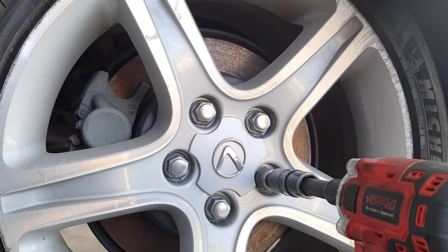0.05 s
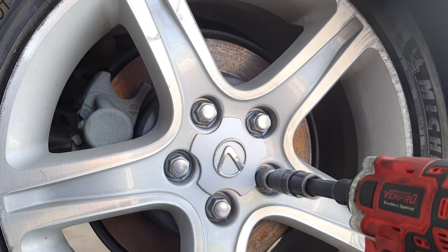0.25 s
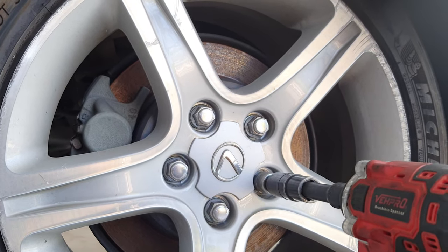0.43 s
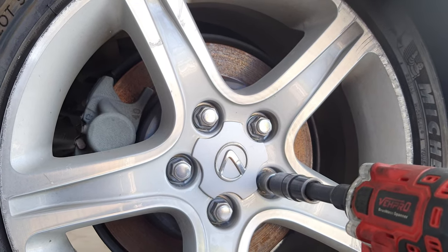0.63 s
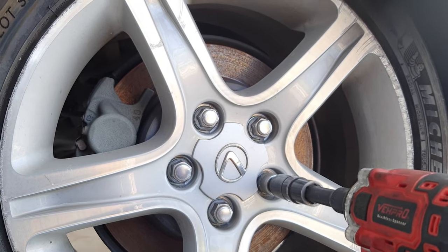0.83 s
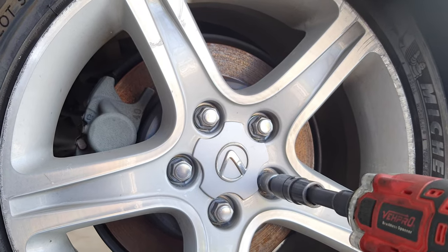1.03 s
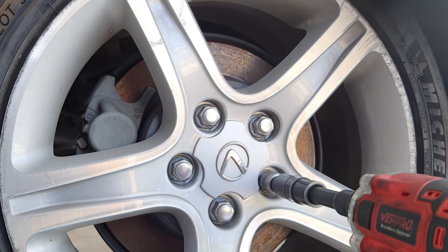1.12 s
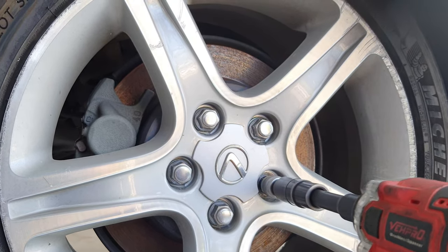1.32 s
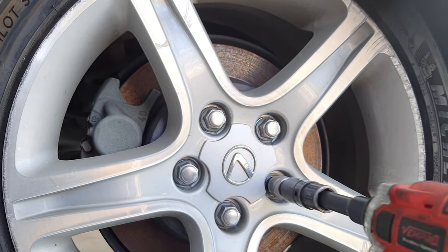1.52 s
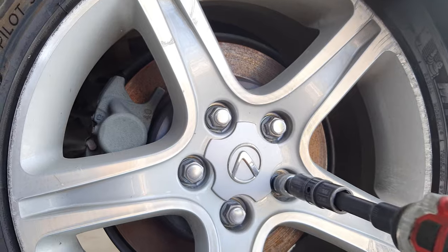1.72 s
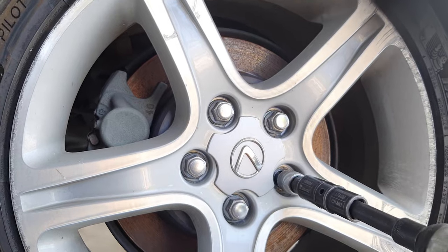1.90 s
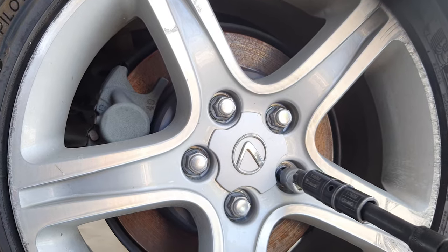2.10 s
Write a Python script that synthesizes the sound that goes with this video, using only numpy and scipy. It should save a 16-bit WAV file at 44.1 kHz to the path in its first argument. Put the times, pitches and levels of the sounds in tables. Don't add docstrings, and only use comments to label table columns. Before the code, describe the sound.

Close, harsh rattling burst of a cordless impact wrench on a car wheel, then winding down to small ticks

```python
import sys
import numpy as np
from scipy import signal
from scipy.io import wavfile
from scipy.ndimage import uniform_filter1d

SR = 44100
rng = np.random.default_rng(int(sys.argv[2]) if len(sys.argv) > 2 else 0)


def boost_factor(decibels):
    exponent = np.asarray(decibels, float) / 20
    return 10 ** exponent


def transcribe(signal):
    frames = np.atleast_2d(signal).T
    limited = np.clip(frames, -1, 1)
    pcm = np.round(limited * 32767).astype(np.int16)
    wavfile.write(sys.argv[1], SR, pcm)


N = 94815

# t/s, level/dB, relative thud level/dB
HAMMER_BLOWS = [(0.234, -8, -19), (0.2606, -8.5, -21), (0.269, -6, -18.5), (0.295, -5, -23),
                (0.317, -3.5, -21), (0.3376, -6, -24), (0.3589, -7, -17.5), (0.378, -6.5, -16),
                (0.4, -5.5, -11), (0.42, -7, -16.5), (0.445, -6, -23), (0.4665, -7, -21), (0.4869, -4, -21),
                (0.507, -6, -13), (0.529, -6, -21.5), (0.549, -5.5, -25), (0.5732, -7.5, -21.5),
                (0.591, -6.5, -16), (0.615, -7, -16), (0.635, -9.5, -20.5),
                (0.6577, -4, -20.5), (0.6781, -6, -17), (0.7005, -6.5, -22), (0.7218, -5.5, -21.5),
              (0.7428, -10, -32.5), (0.7642, -8, -16.5), (0.7838, -7, -12.5), (0.806, -8.5, -19),
              (0.8286, -3, -14), (0.8505, -6, -22), (0.8718, -6.5, -16.5), (0.893, -4.5, -22),
              (0.9147, -5, -17.5), (0.9362, -5, -21), (0.9573, -6.5, -22), (0.9812, -6, -27.5),
              (1.003, -7.5, -23.5), (1.0225, -5.5, -23.5), (1.0442, -5, -16), (1.0692, -5, -31),
              (1.0933, -7, -18.5)]
# t/s, level/dB, f/Hz
STEEL_CRACKS = [(0.2364, -10, 5490), (0.2953, -10.5, 3840), (0.3383, -8, 3790.0), (0.3601, -6.5, 3760),
                (0.38, -9.5, 8100.0), (0.404, -9.5, 5800), (0.4218, -7, 3790.0), (0.4459, -13, 7840.0),
                (0.4893, -11.5, 2076), (0.5318, -13, 2150.0), (0.5505, -14, 4130.0), (0.5738, -7, 7750.0),
                (0.5927, -10, 3554), (0.6173, -11.5, 2760.0), (0.6353, -12, 3700.0), (0.6783, -10, 6600),
                (0.7013, -11.9, 4310.0), (0.723, -10.1, 3960.0), (0.7448, -8, 3900), (0.764, -12, 6220),
                (0.787, -12, 6120.0), (0.808, -11.5, 3360.0), (0.8306, -13.5, 3960.0),
                (0.8502, -11.5, 3270.0), (0.8731, -9, 3705), (0.894, -7.9, 3790.0), (0.9373, -9.5, 6800.0),
                (0.9609, -10, 5340), (0.981, -4.5, 5370), (1.0249, -7, 5770.0), (1.0492, -15.5, 1550.0),
                (1.071, -13, 3270.0)]
# t/s, level/dB, decay/ms, ring f/Hz,
# ring level/dB
GEAR_CLACKS = [(.148, -24.5, 4.5, 1430, -20), (.1545, -29, 8.6, 1060, 4), (.1975, -40, 6, 448, 8),
               (.2105, -22, 8.1, 1072, 2.5), (.216, -23, 3.7, 457, 11), (.3113, -12, 3, 8400, 0),
               (1.211, -32, 3.5, 1000, 12), (1.269, -27, 3, 4500, 5), (1.28, -33.5, 4.1, 680, 15),
               (1.335, -24, 7, 2570, -2.5), (1.364, -23.5, 3.3, 13900, -7), (1.374, -35, 5.8, 1000, 13),
               (1.393, -36.5, 3.6, 570, 26.5), (1.405, -27, 6.8, 1075, 1)]
# t/s, level/dB, decay/ms, ring f/Hz, ring level/dB
LIGHT_TICKS = [(.1205, -39, 2.5, 2040, 15), (.124, -39.5, 2.5, 3600, 5.5), (1.628, -62, 2.5, 1490, 15),
               (1.775, -60, 2.9, 3285, 6), (1.782, -62.5, 4, 1075, 14), (1.795, -63, 5, 1950, 6),
               (1.868, -64, 2.5, 1995, 8), (1.942, -58, 4.5, 2500, 4), (1.962, -67, 4.7, 2620, 9),
               (2.057, -58, 3, 2600, 2), (2.087, -63, 3, 6800, 2), (2.112, -63, 6, 2600, 0)]
# f/Hz, density level/dB
RATTLE_COLOUR = [(120, -33.5), (200, -18.5), (456, -5), (883, -5.5), (1060, -15.5), (1770, -4.5),
                 (10500, -7), (13100, -7.5), (16000, -13)]
# f/Hz, density level/dB
GEAR_COLOUR = [(88, -34), (150, 8.5), (205, -35.5), (354, -5.5), (871, -4.5), (1020, -3.5), (1830, -5),
               (6140, -8), (16000, -17)]
# t/s, level/dB
GEAR_EFFORT = [
    (.148, -78.5),
    (.165, -59),
    (0.204, -39),
    (.215, -42),
    (0.24, -21),
    (1.089, -23.5),
    (1.126, -30),
    (1.391, -31.5),
    (1.425, -46),
]
# f/Hz, level/dB, t60/s
WHEEL_MODES = [(314.3, -6.5, 0.072), (459, -1, 0.07), (570, -9.5, 0.017), (680, -5.5, 0.05),
               (1000, -7.5, 0.041), (1058, -1.5, 0.12), (1091, 1.5, 0.085), (1156, -0.5, 0.072),
               (1958, -7, 0.063), (2680, -10.5, 0.044), (3270, -13, 0.12), (4240, -12, 0.045),
               (5700, -16, .02), (13000, -11, .01)]
# f/Hz, level/dB, t60/s
TYRE_MODES = [(54.5, -7, 0.028), (89.9, -1, 0.092), (145, -4, 0.023), (333, -10, 0.035)]
# f/Hz, level/dB, t60/s
AFTER_MODES = [(364, -2, .4), (461, 1, .4), (785, -3, 0.52), (995, 0, 0.25), (1140, 2, 0.22),
               (2040, -2, 0.26), (2550, -9, 0.27)]
# f/Hz, width/Hz, level/dB
LOOSE_SOCKET = [(176, 35, -4), (330, 49, -1.5), (456, 14, 0.5), (668, 55, -1), (1025, 96, 4),
                (1250, 90, -3), (1562, 60, -3.5), (1950, 47, -5), (2560, 67, -18), (3290, 75, -7),
                (4570, 98, -12.5)]
# start t/s, end t/s, f/Hz, level/dB
MESH_WHINE = [
    (1.23, 1.335, 3320, -37),
    (1.2, 1.35, 2800, -45),
]
# f/Hz, level/dB
MACHINE_TONES = [
    (363, -72.5),
    (788, -81.5),
    (9400, -95.5),
]
# f/Hz, t60/s
REVERBERATION = [(400, 0.36), (3000, 0.56), (7000, 0.37), (14000, 0.14)]
# f/Hz, density level/dB
HUM_COLOUR = [(15, -44), (25, -23), (103, 2), (224, -23), (344, -15), (879, -33.5), (1120, -30),
              (6500, -45), (11000, -65.5)]
# t/s, rumble level/dB, hiss level/dB
HUM_COURSE = [
    (0, -47.5, -30),
    (.11, -50.5, -41),
    (.3, -45, -58),
    (1.5, -50, -48.5),
    (1.6, -57, -51),
    (1.87, -58, -61.5),
    (2.0, -65, -66.5),
    (2.07, -61.5, -61.5),
    (2.15, -53, -63.5),
]
# f/Hz, shared part/1
PORT_LIKENESS = [(200, .2), (640, 0.8), (1400, 0.55), (3000, 0), (7000, 0), (15000, 0.01)]
BANDS_HZ = 200 * 2 ** np.arange(0, 6.6, .5)
LAG_SAMPLES = 5


def table(points, hz):
    p = np.array(points)
    return np.interp(np.log(hz), np.log(p[:, 0]), p[:, 1])


def band(x, hz):
    flip = (-1.) ** np.round(2 * np.log2(hz))
    edges = [hz / 2 ** .25, hz * 2 ** .25]
    return flip * signal.sosfilt(signal.butter(2, edges, "bandpass", fs=SR, output="sos"), x)


def set_level(x, db):
    hammering = x[..., int(.3 * SR):int(1.05 * SR)]
    return x * boost_factor(db) / np.sqrt(np.mean(hammering ** 2))


def spikes(times, sizes):
    x = np.zeros(N)
    np.add.at(x, np.clip((np.asarray(times) * SR).astype(int), 0, N - 1), sizes)
    return x


def fade(x, ms):
    return signal.lfilter([1], [1, -np.exp(-1000 / SR / max(ms, .3))], x)


def grit(spiky):
    g = rng.standard_normal((3, N)) * np.exp(spiky * rng.standard_normal(N))
    return g / g.std()


def ports(g, hz):
    c = np.clip(table(PORT_LIKENESS, hz), 0, 1)
    shared = np.array([np.roll(g[0], LAG_SAMPLES), g[0]])
    return np.sqrt(c) * shared + np.sqrt(1 - c) * g[1:]


def walk(rate_hz):
    k = int(SR / rate_hz)
    w = np.repeat(rng.standard_normal(N // k + 1), k)
    w = uniform_filter1d(uniform_filter1d(w, k), k)[:N]
    return w / w.std()


def ring(x, modes):
    out = 0
    for hz, db, t60 in modes:
        r = np.exp(-np.log(1000) / (t60 * SR))
        w = 2 * np.pi * hz / SR
        gain = boost_factor(db) * np.sin(w) * np.sqrt(1 - r)
        out = out + gain * signal.lfilter([1], [1, -2 * r * np.cos(w), r * r], x)
    return out


def hammer():
    t, db, thud_db = np.array(HAMMER_BLOWS).T
    bounce_ms = 3.2
    first = t + (bounce_ms + .8 * rng.standard_normal(len(t))) / 1000
    second = t + (1.9 * bounce_ms + 1.5 * rng.standard_normal(len(t))) / 1000
    contacts, bounce_db = [t, first, second], -7.5
    blows = rattle(contacts, db, thud_db, bounce_db) + wheel_ring(contacts, db, bounce_db) + pings(t, db)
    return blows, tyre_thud(t, db, thud_db)


def rattle(contacts, db, thud_db, bounce_db):
    g, out = grit(.3), 0
    rise_ms, decay_ms, scatter_db = 0.2, 3.6, 2.5
    climb = spikes(contacts[0][1:], boost_factor(db[1:] - 9))
    cam = rise_ms * SR / 1000 * fade(climb[::-1], 5)[::-1]
    for hz in BANDS_HZ:
        heavy = (thud_db + 19.0) * np.clip(np.log2(1200 / hz) / 1.5, 0, 1)
        hits = 0
        for j, times in enumerate(contacts):
            scatter = scatter_db * rng.standard_normal(len(db))
            hits = hits + spikes(times, boost_factor(db + heavy + j * bounce_db + scatter))
        late = fade(np.roll(hits, int(SR * .6 / hz)), rise_ms)
        envelope = fade(late, decay_ms * (4000 / hz) ** 0.23) + cam
        out = out + boost_factor(table(RATTLE_COLOUR, hz)) * band(ports(g, hz) * envelope, hz)
    return set_level(key(out), -18.5)


def key(x):
    return x + boost_factor(1.5) * signal.lfilter(*signal.iirpeak(13100, 5.5, fs=SR), x)


def wheel_ring(contacts, db, bounce_db):
    shake = fade(spikes(contacts[0], boost_factor(db)) + spikes(contacts[1], boost_factor(db + bounce_db)), 5)
    shake = fade(shake, 4) * boost_factor(5.0 * walk(60))
    return set_level(ring(ports(grit(.3), 1000) * shake, WHEEL_MODES), -28.5)


def pings(times, db):
    out, t = np.zeros(N + 2000), np.arange(1200) / SR
    t60_s = 0.026
    draw = rng.random((len(times), 5, 3))
    for at, size_db, rows in zip(times, db, draw):
        for late, pitch, size in rows:
            a = int((at + .007 * late) * SR)
            hz = 1300 * 11 ** pitch
            envelope = boost_factor(size_db - 21 * size - 60 * t / t60_s) * np.clip(t / .0006, 0, 1)
            out[a:a + len(t)] += envelope * np.sin(2 * np.pi * hz * t)
    return set_level(np.array([np.roll(out, LAG_SAMPLES), out])[:, :N], -32.5)


def tyre_thud(t, db, thud_db):
    push = side = 0
    for mode in TYRE_MODES:
        sizes = boost_factor(1.1 * (db + thud_db))
        push = push + ring(spikes(t + 0.0033, sizes * rng.choice([-1, 1], len(t))), [mode])
        side = side + ring(spikes(t + 0.0033, sizes * rng.choice([-1, 1], len(t))), [mode])
    side = side - push * np.dot(side, push) / np.dot(push, push)
    return set_level(push, -28) + set_level(side, -23.5) * np.array([[1], [-1]])


def cracks():
    out, t = np.zeros((2, N)), np.arange(300) / SR
    cycles, pan_db = 3.5, 6
    draw = rng.standard_normal((len(STEEL_CRACKS), 2))
    for (at, db, hz), (side, flip) in zip(STEEL_CRACKS, draw):
        burst = np.sign(flip) * boost_factor(db + 4) * np.exp(-t * hz * 2 / cycles) * np.sin(2 * np.pi * hz * t)
        a = int(at * SR)
        for c, sign in enumerate((1, -1)):
            out[c, a:a + len(t)] += boost_factor(sign * pan_db * side / 2) * burst
    return out


def gears():
    g, grind, common = grit(0.49), 0, walk(60.37)
    for hz in BANDS_HZ:
        gain = boost_factor(table(GEAR_COLOUR, hz) + 1.2 * common + 1.8 * walk(70))
        grind = grind + gain * band(ports(g, hz), hz)
    sing = loose = 0
    for hz, db, t60 in WHEEL_MODES:
        sing = sing + ring(ports(g, hz) * boost_factor(2.6 * walk(25)), [(hz, 0.9 * db, t60)])
    for hz, wide, db in LOOSE_SOCKET:
        loose = loose + ring(ports(g, hz) * boost_factor(5.1 * walk(21.95)), [(hz, db, 2.95 / wide)])
    on = np.arange(N) < 1.11 * SR
    out = set_level(np.where(on, key(grind), grind), 0)
    out = out + np.where(on, set_level(sing, -6), set_level(loose, -6.5))
    t, db = np.array(GEAR_EFFORT).T
    return out * boost_factor(np.interp(np.arange(N) / SR, t, db, left=-120, right=-120))


def unsteady_tone(hz):
    phase = 2 * np.pi * np.cumsum(hz * (1 + .003 * walk(40))) / SR
    return np.sin(phase) * boost_factor(3.5 * walk(35))


def whine():
    t, out = np.arange(N) / SR, 0
    for a, b, hz, db in MESH_WHINE:
        gate = np.interp(t, [a, a + 0.03, b - .01, b], [0, 1, 1, 0])
        out = out + boost_factor(db) * unsteady_tone(hz) * gate
    return np.array([np.roll(out, LAG_SAMPLES), out])


def clacks(rows, tilt_db):
    g, out, n = grit(0.27), np.zeros((2, N)), 6000
    for t, db, ms, ring_hz, ring_db in rows:
        a = int(t * SR)
        ms = max(ms, .5)
        s = np.arange(min(n, N - a)) / SR
        env = boost_factor(db) * np.exp(-s * 1000 / ms)
        cut = g[:, a:a + n] * env
        for hz in BANDS_HZ[2:]:
            out[:, a:a + n] += boost_factor(tilt_db * np.log2(hz / 3000)) * band(ports(cut, hz), hz)
        soft_ends = np.hanning(n)[:len(env)] ** 0.084
        drive = boost_factor(-13.5) * env * soft_ends * np.sin(2 * np.pi * ring_hz * s)
        out[:, a:a + n] += ring(drive, [(ring_hz, ring_db, 4 * ms / 1000)])
    return out


def afterring():
    jolt = fade(spikes([1.4], boost_factor(-36.5)), 13.4)
    return ring(ports(grit(0.26), 680) * jolt, AFTER_MODES)


def room(x):
    t, tail = np.arange(int(.8 * SR)) / SR, 0
    for hz in BANDS_HZ:
        decay = boost_factor(-60 * t / table(REVERBERATION, hz)) * np.clip(t / 0.0069, 0, 1)
        tail = tail + band(rng.standard_normal((2, len(t))), hz) * decay
    tail = tail / np.sqrt(np.sum(tail ** 2) / 2)
    return boost_factor(-14) * signal.fftconvolve(x, tail, axes=1)[:, :N]


def distant_machines():
    return sum(boost_factor(db) * unsteady_tone(hz) for hz, db in MACHINE_TONES)


def hum():
    out, g = 0, rng.standard_normal((3, N))
    t, db, hiss_db = np.array(HUM_COURSE).T
    now = np.arange(N) / SR
    db, hiss_db = np.interp(now, t, db), np.interp(now, t, hiss_db)
    for hz in 32 * 2 ** np.arange(0, 9, .5):
        c = np.clip(1.0 - 0.17 * np.log2(max(hz / 150, 1)), 0, .95)
        high = np.clip(np.log2(hz / 250) / 4.0, 0, 1)
        course = high * hiss_db + (1 - high) * db
        gain = boost_factor(table(HUM_COLOUR, hz) + 2.0 * walk(12.0) + 25 + course)
        out = out + gain * band(np.sqrt(c) * g[0] + np.sqrt(1 - c) * g[1:], hz)
    return out * boost_factor(np.array([[-.8], [.8]]))


def scene():
    blows, thud = hammer()
    ticks = clacks(LIGHT_TICKS, tilt_db=-4.5)
    tool = blows + gears() + clacks(GEAR_CLACKS, tilt_db=-2.0)
    tool = tool + ticks + boost_factor(-19.5) * ring(ticks, WHEEL_MODES)
    direct = tool + thud + cracks() + whine() + afterring()
    return direct + room(tool) + distant_machines() + hum()


def top_cut(x):
    return signal.sosfilt(signal.butter(12, 16990, fs=SR, output="sos"), x)


def record(dry):
    x = signal.sosfilt(signal.butter(2, 36, "highpass", fs=SR, output="sos"), dry)
    x = np.clip(x, -.92, .92)
    x = signal.sosfilt(signal.ellip(10, .2, 70, 15900, fs=SR, output="sos"), x)
    return top_cut(x)


dry = scene()
out = record(dry)
transcribe(out)
```